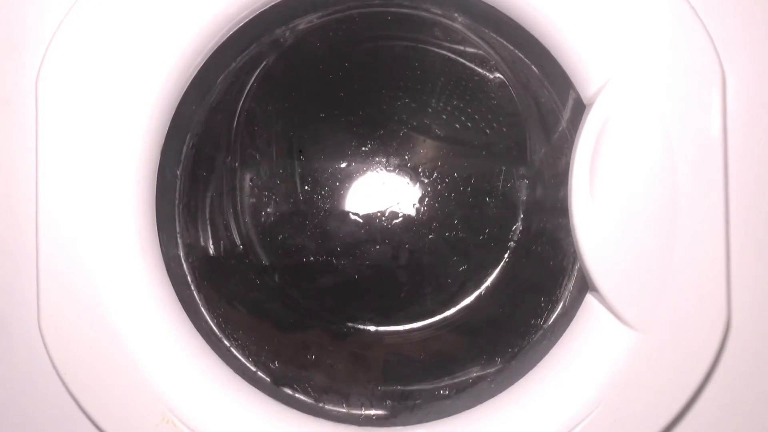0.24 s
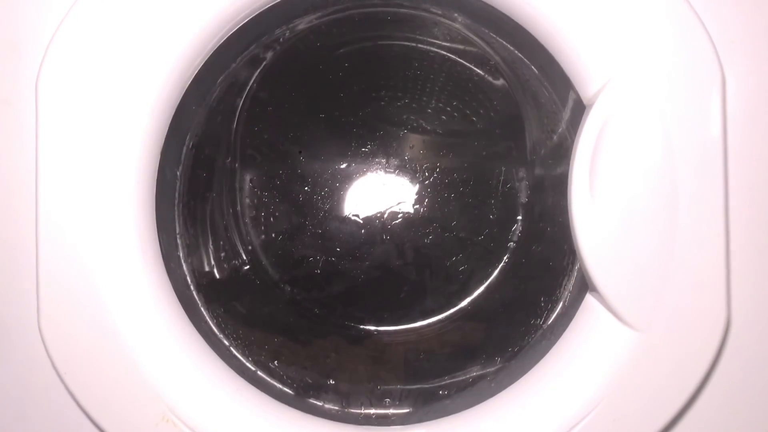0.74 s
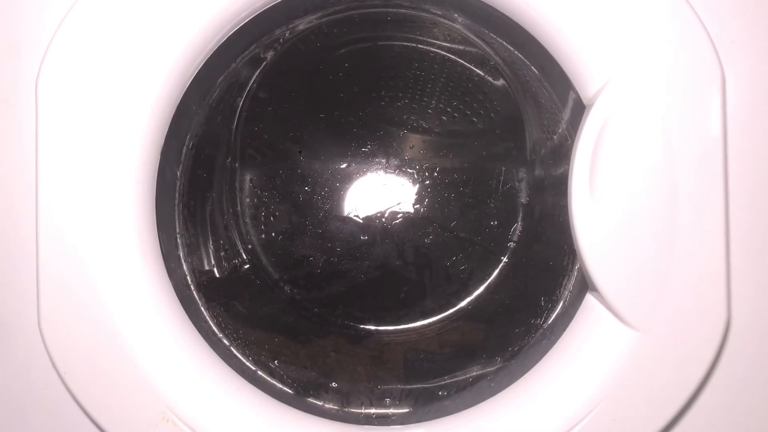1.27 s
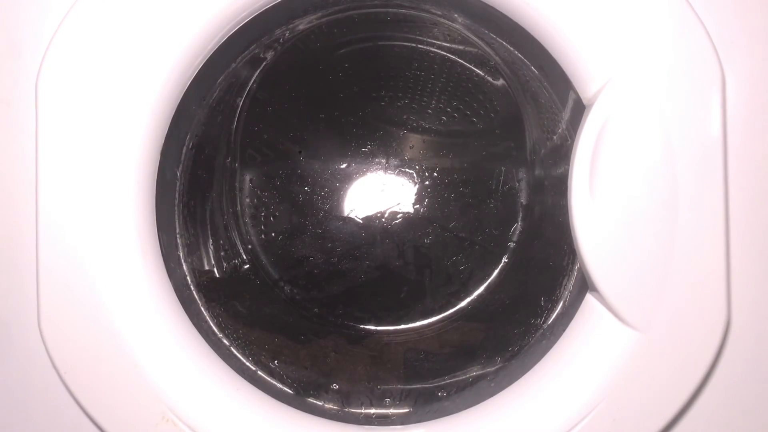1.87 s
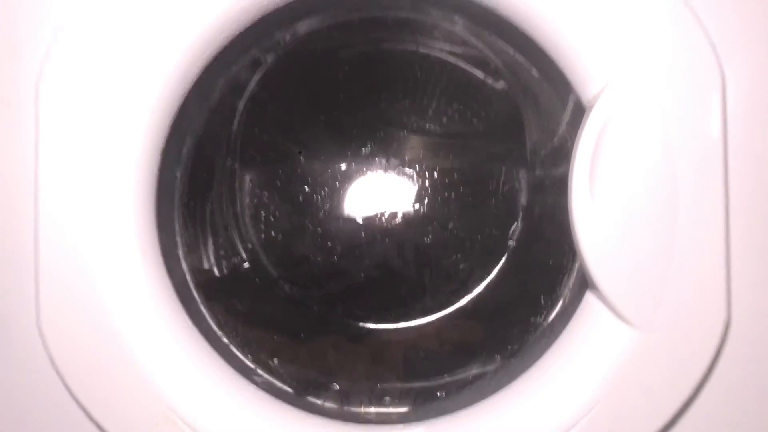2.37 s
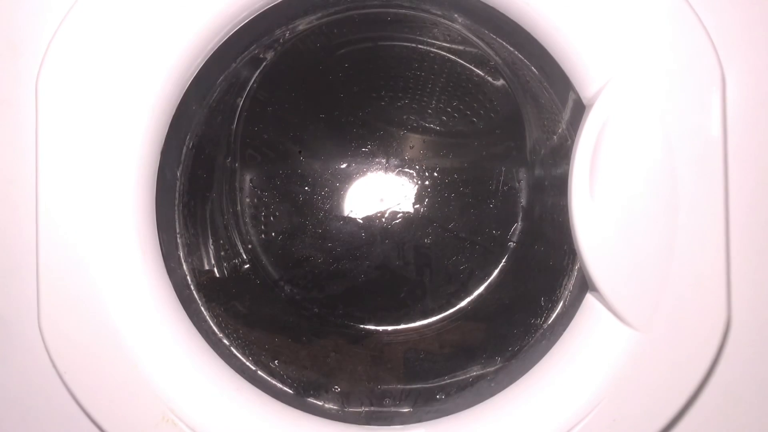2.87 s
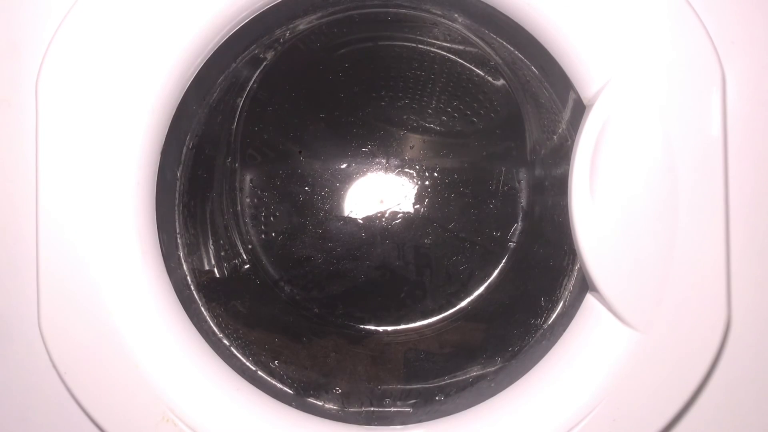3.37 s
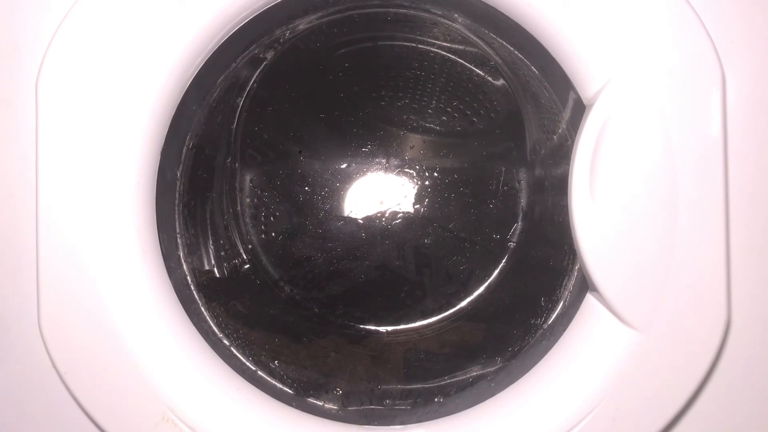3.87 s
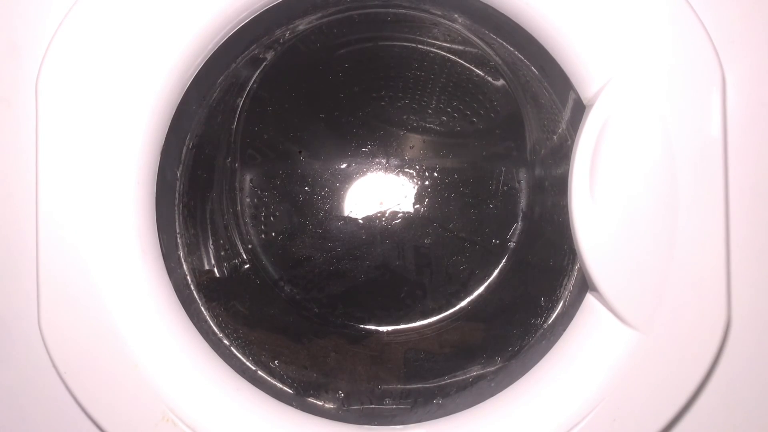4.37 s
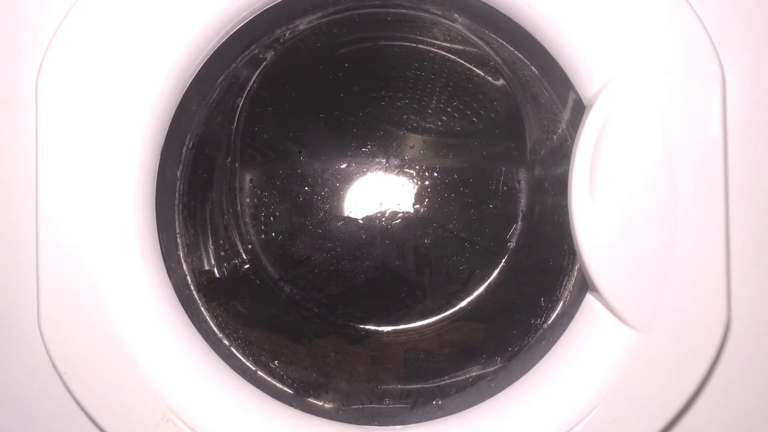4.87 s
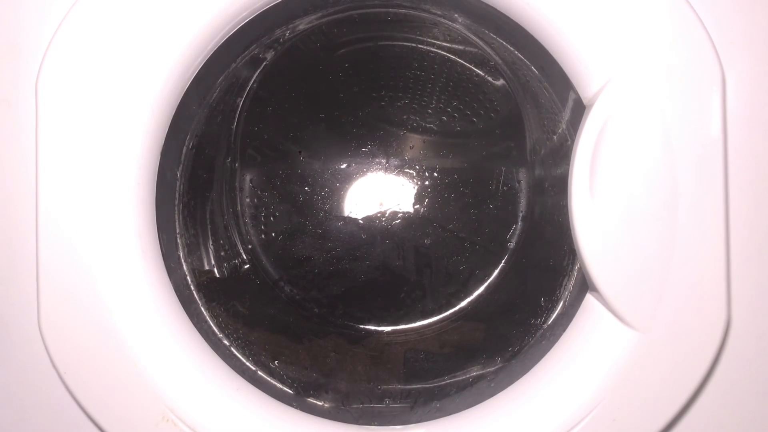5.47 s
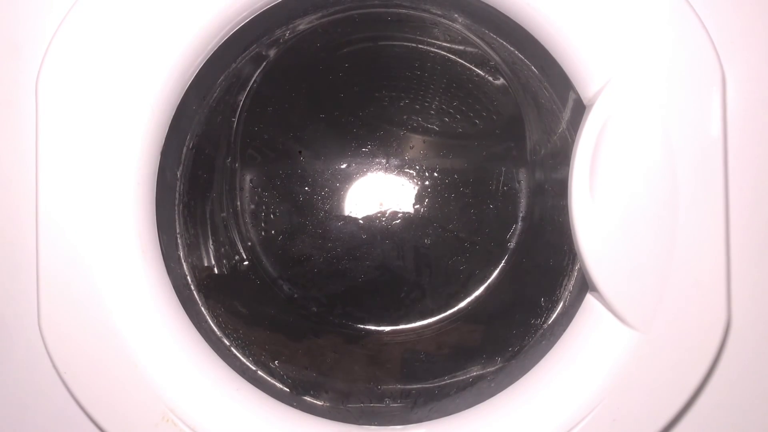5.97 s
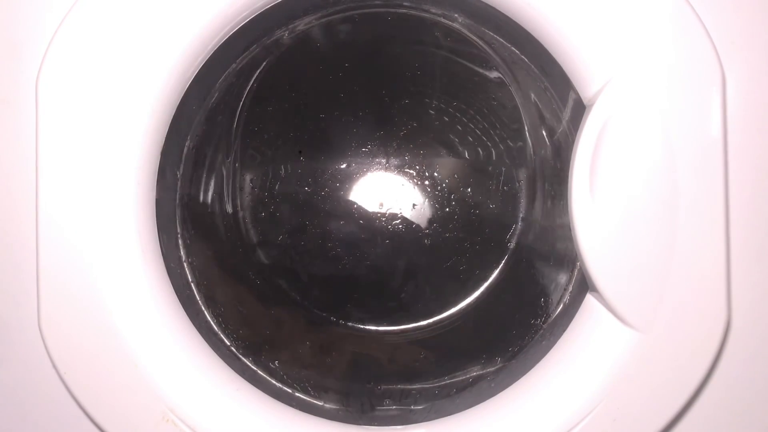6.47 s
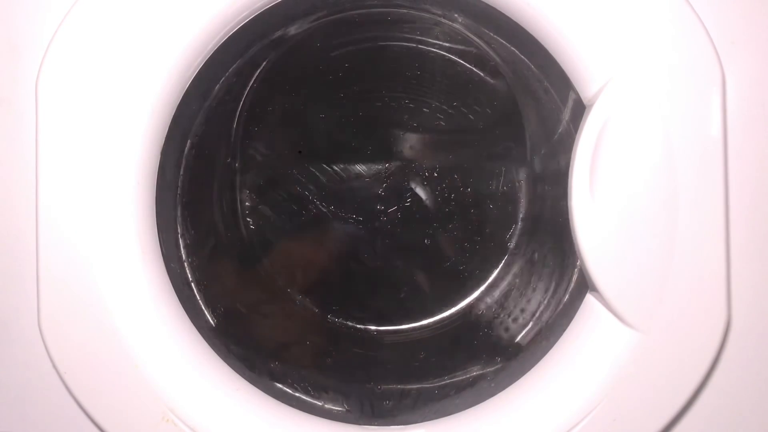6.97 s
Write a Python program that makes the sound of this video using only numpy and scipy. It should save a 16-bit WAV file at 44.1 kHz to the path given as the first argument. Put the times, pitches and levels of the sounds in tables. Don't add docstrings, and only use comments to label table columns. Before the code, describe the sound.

Thumping and scuffing on a washer, one heavy door slam, near silence, a sharp click, then a rising motor hum with sloshing and knocks.

```python
import sys
import numpy as np
from scipy import signal
from scipy.io import wavfile

SR = 44100
rng = np.random.default_rng(int(sys.argv[2]) if len(sys.argv) > 2 else 0)


def elevation(decibels):
    levels = np.asarray(decibels, float)
    return 10 ** (levels / 20)


def bounce(signal):
    frames = np.transpose(np.atleast_2d(signal))
    limited = np.clip(frames, -1, 1)
    pcm = np.round(limited * 32767).astype(np.int16)
    wavfile.write(sys.argv[1], SR, pcm)


N = 318402
TIME = np.arange(N) / SR

# start_s, peak_db, centre_hz
PUSHES = [(0.083, -26, 186), (0.137, -15, 143), (0.198, -19, 127), (0.2535, -5, 150), (0.33, -22.5, 174),
          (0.392, -25, 140), (0.434, -28, 124), (0.501, -18, 120), (0.588, -17.5, 127), (0.656, -15, 137),
          (0.757, -29, 140), (1.706, -32, 160), (1.83, -31.5, 147), (1.87, -33.5, 146),
          (2.001, -30.5, 142.4), (2.036, -32, 166), (2.095, -34.5, 133.9), (2.15, -35, 134.9),
          (2.254, -40, 146.1), (2.3515, 0.5, 134), (2.666, -20.5, 126), (2.838, -38.5, 86.1)]
# start_s, peak_db, centre_hz
STEPS = [(3.601, -33, 110), (3.638, -38.5, 86.1), (4.042, -32.5, 80), (4.091, -39.5, 52.6),
         (4.167, -37.5, 88), (4.235, -29, 51.1), (4.319, -36.5, 48.7), (4.429, -44, 51.1),
         (4.509, -44, 48.4), (4.58, -43, 53.8), (4.767, -35.5, 69.5), (4.792, -39, 59.2),
         (5.794, -37, 67.2), (5.823, -42.5, 54.5), (5.92, -47.5, 53.8)]
# start_s, length_s, sway_db, boom_db
JOSTLES = [(0, .07, -66, -46.5), (0.101, 0.59, -56, -29), (.28, .07, -41, -35), (.72, 0.098, -63, -42),
           (.92, 0.27, -61, -61.5), (1.2, 0.44, -55, -58.5), (1.72, 0.21, -61, -50.5),
           (1.98, 0.22, -68, -56), (2.269, 0.065, -60, -47), (2.4, .16, -39, -40),
           (2.621, .18, -50.5, -43.5), (2.86, .7, -58.5, -60), (3.63, .06, -51.5, -66),
           (4.05, .12, -51.5, -54.5), (4.228, .07, -42, -58), (4.36, 0.28, -60, -62),
           (4.661, 0.39, -66, -66), (5.0, 1.4, -80, -76), (5.718, .14, -64, -60), (6.45, .77, -70, -63.5),
           (6.86, .07, -49, -75), (7.02, 0.074, -65, -56), (7.17, .05, -48, -78)]
JOSTLE_RISE_DB_S, JOSTLE_FALL_DB_S = 600, 130
# mode_hz, level_db, t60_s
CABINET_MODES = [(48.5, 2.5, 0.17), (69.2, -1.5, 0.22), (98, -5.5, 0.23), (127, -1, 0.2),
                 (169.6, -1.5, 0.15), (188.8, -6.5, 0.13)]

# centre_hz, width_hz, level_db
PANEL_MODES = [(290, 60, -1), (355, 40, 0), (445, 50, -1), (545, 60, -2), (670, 60, 0), (830, 60, -1),
               (940, 40, 3), (1025, 60, -3), (1135, 80, -5), (1265, 90, -6), (1440, 100, -9)]
# frequency_hz, density_db (per Hz)
MIDDLE = [(820, -30), (1400, -3), (1690, 1), (1820, -4.5), (2850, -5), (3710, -10.5), (6000, -19.5),
          (7800, -46.5), (13200, -120)]
# frequency_hz, density_db (per Hz)
BRIGHT = [(4500, -7), (6300, -3.5), (9000, -9), (11500, -4)]
# frequency_hz, density_db (per Hz)
AIRY = [(11000, 0), (16500, 0)]
# start_s, length_s, scuff_db, scuff_centre_hz, hiss_db
RUBS = [(0, .05, -60, 468, -73), (.1, .05, -46.5, 600, -62.5), (.16, 0.071, -39.5, 940, -62),
        (.29, 0.096, -35, 955, -59.5), (.42, .14, -44, 900, -64), (.6, 0.085, -44.5, 710, -62.5),
        (.73, .05, -66, 900, -73), (.86, 0.34, -67, 535, -82.5), (.98, 0.037, -63, 600, -73.5),
        (1.19, 0.058, -52.5, 470, -76.5), (1.3, .13, -56.5, 453, -79.5), (1.46, 0.3, -62, 460, -74.5),
        (1.76, .36, -64, 570, -84.5), (2.3, .04, -55, 400, -78.5), (2.45, .1, -66, 700, -73),
        (2.62, .03, -69, 500, -64.5), (2.64, .02, -46, 700, -60), (2.76, 0.77, -72, 500.6, -92)]
# start_s, length_s, scuff_db, scuff_centre_hz, hiss_db
CLOTH = [
    (3.55, .45, -78, 450, -89),
    (4.07, .24, -59, 360, -73.5),
    (4.49, .07, -63.5, 350, -72.5),
    (4.72, 0.12, -72.5, 400, -78),
    (4.85, .22, -62, 401, -72),
]
# start_s, length_s, scuff_db, scuff_centre_hz, hiss_db
WET_LOAD = [
    (5.55, .85, -70.5, 500, -89),
    (5.74, .1, -65, 600, -83),
    (5.96, 0.077, -66.5, 590, -78.5),
    (6.25, .2, -62.5, 577, -83),
    (6.47, 0.21, -54, 443, -69),
    (6.7, 0.17, -53, 600, -69),
    (6.87, 0.33, -54, 540, -66.5),
]
RUB_RISE_DB_S, RUB_FALL_DB_S = 400, 250
HAND_MIDDLE_DB, CLOTH_MIDDLE_DB, WET_MIDDLE_DB = 8, 3, 6
# start_s, dull_peak_db, dull_centre_hz, middle_db, bright_db
DOOR_KNOCKS = [(0.081, -31, 597, -50, -61), (0.143, -38, 940, -54, -54), (0.256, -25, 910, -34, -39.5),
               (0.388, -27, 940, -48, -57), (0.484, -46, 945, -51, -62), (0.576, -37, 805, -52, -57),
               (0.642, -22.5, 430, -49, -60), (0.711, -44, 400, -54, -66), (0.746, -35, 960, -54, -65),
               (1.017, -52, 1300, -68, -69), (1.073, -64, 468, -59.5, -72), (1.176, -41, 322, -63, -70),
               (1.307, -38, 444, -64, -68), (1.703, -50, 649, -57, -59), (1.843, -35, 550, -68, -78),
               (2.002, -33, 484, -64, -71), (2.15, -38, 330, -65, -77)]
# start_s, dull_peak_db, dull_centre_hz, middle_db, bright_db
LATER_KNOCKS = [(3.6, -38, 655, -81, -73), (3.696, -50, 450, -71.5, -82), (3.847, -62.5, 676, -63, -71),
                (4.041, -34.5, 355, -49, -55), (4.098, -51, 350, -69, -69), (4.184, -35, 345, -81, -78),
                (4.207, -28, 690, -56, -73), (4.217, -36, 355, -70, -80), (4.497, -51.5, 350, -70, -70),
                (4.86, -55, 658, -64, -67), (5.789, -64, 598, -63, -79.5), (5.9, -54, 603, -82.5, -87),
                (6.48, -52, 301, -59, -63), (6.918, -48, 603, -70, -60), (7.04, -36, 660, -45, -49),
                (7.1, -34, 670, -47, -53), (7.138, -49, 603, -52, -55)]
# start_s, dull_peak_db, dull_centre_hz, middle_db, bright_db
SLAMS = [
    (2.3455, -9, 880, -21, -23),
    (2.353, -8, 800, -18.5, -21.5),
    (2.6625, -24, 750, -36, -43),
    (5.3695, -35, 600, -60, -60),
]
KNOCK_T60_S, SLAM_T60_S = .075, .066
DULL_SHORTENS_S_PER_DB = .0006

# mode_hz, level_db, t60_s
DOOR_MODES = [(544, -5, .18), (655, -5, .16), (721, -4, .15), (832, -3, .16), (899, -2, .16), (948, 0, .12),
              (1021, -1, .13), (1139, -7, .13), (1264, -8, .13), (1440, -12, .12), (2550, -27, .35),
              (3320, -25, .35)]
# start_s, peak_db
DOOR_TAPS = [
    (.385, -41),
    (2.3465, -21),
    (2.3525, -19),
    (2.665, -39),
]
# mode_hz, level_db, t60_s
LATCH_MODES = [(1670, 1.5, 0.06), (2030, -8, 0.09), (5400, -9, .06), (670, -4.5, .07), (960, -5, .06),
               (2780, -9, .05)]
# start_s, peak_db
LATCH_TAPS = [
    (7.1, -43),
    (7.137, -61),
]
# start_s, peak_db
LATCH_RATTLE = [
    (7.103, -43),
    (7.107, -44),
    (7.113, -50),
]
# mode_hz, level_db, t60_s
DRUM_MODES = [(1712, -9, .6), (1981, -10, .45), (2250, -14, .7), (2498, -6, .45), (2837, -5, .25),
              (3198, 0, .8), (3774, -10, .7), (4398, -14, .6)]
# start_s, peak_db
DRUM_TAPS = [
    (0.714, -57),
]
# mode_hz, level_db, t60_s
RIM_MODES = [(2455, -2, .25), (2545, 0, .35), (2640, -3, .2)]
# start_s, peak_db
RIM_TAPS = [
    (.716, -61),
    (.731, -63),
    (.749, -65),
]

# start_s, peak_db, top_hz, swell_s, t60_s
RAPS = [(.081, -34, 1500, .002, .08), (.13, -40, 3000, .014, .08), (.38, -42, 3200, .008, .1),
        (.59, -44, 3200, .008, .08), (.713, -45, 2800, .006, .2), (1.01, -52, 1700, .01, .12),
        (1.098, -54, 1500, .003, .06), (1.179, -44, 1400, .001, .04), (1.203, -48, 1300, .003, .08),
        (1.235, -50, 1500, .004, .06), (1.31, -48, 1200, .002, .05), (2.127, -48, 800, .001, .03),
        (2.135, -39, 1500, .002, .035), (2.149, -46, 1100, .004, .12), (2.257, -62, 3800, .005, .1),
        (2.357, -20, 1300, .002, .06), (2.663, -26, 2400, .001, .05), (2.682, -34, 1100, .005, .15),
        (4.034, -46, 2400, .003, .06), (4.046, -41, 1500, .004, .1), (4.218, -44, 1300, .005, .1),
        (6.745, -50, 1300, .01, .1), (6.774, -43, 1400, .008, .12), (6.81, -48, 2400, .01, .12),
        (6.85, -45, 1700, .006, .08), (7.037, -34, 3200, .004, .09), (7.097, -36.5, 4200, .005, .1),
        (7.134, -41, 5000, .006, .12)]
# centre_hz, width_hz, level_db
RELAY_MODES = [(900, 600, -7), (1520, 300, -3), (2650, 700, 0), (3400, 300, -7), (4250, 300, -5),
               (5000, 500, -6), (6300, 1300, 0), (8900, 1100, 1), (9700, 500, -6), (12200, 1500, -3),
               (13700, 900, -9), (15100, 600, -7)]
RELAY_S, RELAY_DB, RELAY_T60_S, RELAY_WIDENING = 5.3695, -26.5, .065, 1.5

MAINS_HZ, SPIKE_S = 50.03, 5.199
BUZZ_ON_S, BUZZ_DB = 3.66, -76.5
# harmonic (multiple of the mains), level_db
BUZZ = [(1, 7), (3, 2), (5, 0), (7, -2), (9, -2), (11, -3), (13, -3), (15, -11), (17, -5), (19, -11),
        (21, -11)]
# harmonic (multiple of the mains), level_db
WINDING = [(1, -7.5), (3, 2), (5, -2.5), (7, -4.5), (9, -13.5), (11, -24.5), (13, -10.5)]
# harmonic (multiple of the mains), level_db
ROTOR = [(2, -61), (4, -2.5), (6, 2.5), (8, -11)]
# harmonic (multiple of the mains), level_db
CASING = [(10, -10.5), (12, 3.5), (14, -6), (16, -23.5)]
# time_s, level_db
LOAD = [
    (5.36, -110),
    (5.5, -80),
    (5.8, -68.5),
    (6.1, -69.5),
    (6.3, -63),
    (6.75, -54.5),
    (6.9, -60.5),
    (7.05, -55.5),
    (7.22, -54),
]
ROTOR_DB, ROTOR_GROWTH = -61, 1.8
CASING_TOP_DB, CASING_GROWTH = -62, 1.5
# whistle_hz, level_db
SWITCHING = [(8624, -89), (8726, -88)]
SWITCHING_ON_S, SWITCHING_OFF_S = 5.45, 6.5
# centre_hz, width_hz, level_db (relative to the casing whine)
BRUSHES = [(2300, 260, -13), (3300, 300, -17)]

# time_s, level_db
SLOSH = [
    (6.42, -90),
    (6.5, -64),
    (6.6, -68),
    (6.8, -54),
    (6.95, -62),
    (7.22, -60),
]
BUBBLES_PER_S, BUBBLE_LOW_HZ, BUBBLE_HIGH_HZ, BUBBLE_CYCLES = 500, 700, 2600, 14

# frequency_hz, t60_s
ROOM = [(300, .32), (1100, 0.17), (3000, .2), (8000, .16)]
ROOM_DB = -4.5
# frequency_hz, density_db (per Hz)
FLOOR = [(200, -16), (400, -10), (900, -13), (1300, -8.5), (2040, -20.5), (3300, -15.5), (4900, -22.5),
         (10000, -24.5), (16400, -33)]
FLOOR_DB = -70
# frequency_hz, density_db (per Hz)
HOUSE = [(62, 0), (125, -4)]
HOUSE_DB = -82
# low_hz, high_hz, level_db
PULSED_HISS = [(14200, 15800, -84.5), (11300, 13600, -88)]
PULSE_RATE_HZ, PULSE_CENTRE_S, PULSE_WIDTH_S, PULSE_SCATTER_DB = 30, 3.222, .006, 4.0
# centre_hz, width_hz, share_added (linear)
MICROPHONE = [(7770, 1300, -0.19), (10400, 1100, -0.51), (14800, 1900, 0.6)]
CUTOFF_HZ = 16100


def rms_one(x):
    return x / np.sqrt(np.mean(x ** 2) + 1e-30)


def in_time(rows):
    s, *columns = np.transpose(rows)
    return [np.interp(TIME, s, c) for c in columns]


def at_hz(points, hz):
    point_hz, value = np.array(points).T[:2]
    return np.interp(np.log(hz), np.log(point_hz), value)


def drift(rate):
    r = np.exp(-80 * np.pi * rate / SR)
    white = rng.standard_normal(N // 40 + 2002)
    slow = signal.lfilter([1], [1, -2 * r, r * r], white)[2000:]
    return np.interp(np.arange(N) / 40, np.arange(len(slow)), rms_one(slow))


def ring(x, hz, t60):
    r, w = elevation(-60 / (t60 * SR)), 2 * np.pi * hz / SR
    return signal.lfilter([0, np.sin(w)], [1, -2 * r * np.cos(w), r * r], x + 1e-18)


def banded_noise(spectrum, patchy_db):
    out, together = 0, drift(15)
    low_hz, high_hz = spectrum[0][0], spectrum[-1][0]
    edges = low_hz * 2 ** np.arange(0, np.log2(high_hz / low_hz) + .2, .34)
    white = rng.standard_normal((2, N))
    for k, (low, high) in enumerate(zip(edges, edges[1:])):
        sos = signal.butter(2, [low, high], "band", fs=SR, output="sos")
        band = signal.sosfilt(sos, white[k % 2])
        flicker_db = patchy_db * (0.77 * together + drift(39))
        out = out + band * elevation(at_hz(spectrum, np.sqrt(low * high)) + flicker_db)
    return rms_one(out)


def spells(rows, gains, rise_db_s, fall_db_s):
    t, start, length = TIME[::64], np.array(rows)[:, :1], np.array(rows)[:, 1:2]
    rise_db = -rise_db_s * np.maximum(start - t, 0)
    fall_db = -fall_db_s * np.maximum(t - start - length, 0)
    power = gains ** 2 @ elevation(rise_db + fall_db) ** 2
    return np.array([np.interp(TIME, t, line) for line in np.sqrt(power)])


def cabinet():
    shake_gains = elevation(np.array(JOSTLES)[:, 2:].T)
    sway, boom = spells(JOSTLES, shake_gains, JOSTLE_RISE_DB_S, JOSTLE_FALL_DB_S)
    s, peak_db, centre_hz = np.transpose(PUSHES + STEPS)
    luck = rng.normal(0, 1.6, (len(s), len(CABINET_MODES)))
    out = np.zeros(N)
    for k, (hz, level_db, t60) in enumerate(CABINET_MODES):
        clicks = np.zeros(N)
        distance_db = 9.9 * np.log2(hz / centre_hz) ** 2
        clicks[(s * SR).astype(int)] = elevation(peak_db - 9 + level_db - distance_db + luck[:, k])
        push = signal.windows.hann(int(.4 * SR / hz))
        pushes = signal.oaconvolve(clicks, 2 * push / push.sum())[:N]
        shaking = (sway if k < 2 else boom) * elevation(-7.0 + level_db + 0.53 * drift(11))
        out += ring(pushes, hz, t60) * (-1) ** k
        out += shaking * rms_one(ring(rng.standard_normal(N), hz, t60))
    return out


def focus(centre_hz, spread_db):
    octaves = np.log2(np.array(PANEL_MODES)[:, :1] / centre_hz)
    gains = elevation(np.array(PANEL_MODES)[:, 2:] - spread_db * np.minimum(np.abs(octaves), 1.2))
    return gains / np.sqrt(np.sum(gains ** 2, axis=0))


def rubbing():
    strokes = RUBS + CLOTH + WET_LOAD
    middle_over_db = np.repeat([HAND_MIDDLE_DB, CLOTH_MIDDLE_DB, WET_MIDDLE_DB],
                               [len(RUBS), len(CLOTH), len(WET_LOAD)])
    scuff_db, centre_hz, hiss_db = np.array(strokes)[:, 2:].T
    dull_gains = elevation(scuff_db - 2) * focus(centre_hz, spread_db=11)
    sharp_gains = elevation(np.array([hiss_db + middle_over_db, hiss_db - .6, hiss_db - 10.5]))
    dull = elevation(2.5 * drift(25)) * spells(strokes, dull_gains, RUB_RISE_DB_S, RUB_FALL_DB_S)
    sharp = elevation(1.6 * drift(27)) * spells(strokes, sharp_gains, RUB_RISE_DB_S, RUB_FALL_DB_S)
    return dull, sharp


def panels():
    dull, sharp = rubbing()
    for s, peak_db, centre_hz, middle_db, bright_db in DOOR_KNOCKS + LATER_KNOCKS + SLAMS:
        dullness_db = peak_db - bright_db
        t60 = (KNOCK_T60_S if peak_db < -22 else SLAM_T60_S) - DULL_SHORTENS_S_PER_DB * dullness_db
        i = round(s * SR)
        t = TIME[:min(N - i, SR // 2)]
        rise_s = min(0.00018 * elevation(0.62 * dullness_db), .006)
        burst = elevation(-60 * t / max(t60, .01)) * (1 - np.exp(-t / rise_s))
        air_db = bright_db + .33 * (bright_db + 21)
        dull[:, i:i + len(t)] += elevation(peak_db - 6.5) * focus(centre_hz, spread_db=14.5) * burst
        sharp[:, i:i + len(t)] += np.outer(elevation(np.array([middle_db, bright_db, air_db]) + 1), burst)
    white = rng.standard_normal((2, N))
    out = sum(gain * banded_noise(colour, patchy_db=2.5)
              for gain, colour in zip(sharp, (MIDDLE, BRIGHT, AIRY)))
    for k, (hz, width_hz, _) in enumerate(PANEL_MODES):
        peak = signal.iirpeak(hz, hz / width_hz / 1.6, fs=SR)
        out += dull[k] * rms_one(signal.lfilter(*peak, signal.lfilter(*peak, white[k % 2])))
    return out


def struck(modes, taps):
    s, peak_db = np.transpose(taps)
    out = np.zeros(N)
    for hz, level_db, t60 in modes:
        clicks = np.zeros(N)
        clicks[np.round(s * SR).astype(int)] = elevation(peak_db + level_db + rng.normal(0, 1, len(taps)))
        out += ring(clicks, hz, t60)
    return out


def raps():
    out, t = np.zeros(N + SR), TIME[:SR // 4]
    for s, peak_db, top_hz, swell_s, t60 in RAPS:
        sos = signal.butter(3, [280, top_hz], "band", fs=SR, output="sos")
        puff = rms_one(signal.sosfilt(sos, rng.standard_normal(len(t))))
        late = np.maximum(t - swell_s, 0)
        envelope = elevation(peak_db - 6 - 60 * late / t60) * np.minimum(t / swell_s, 1)
        out[round(s * SR):][:len(t)] += envelope * puff
    return out[:N]


def relay():
    out, t = np.zeros(N), TIME[:SR // 4]
    snap, shaken = rng.standard_normal(len(t)) * elevation(-60 * t / RELAY_T60_S), 0
    for hz, width_hz, db in RELAY_MODES:
        peak = signal.iirpeak(hz, hz / width_hz / RELAY_WIDENING, fs=SR)
        shaken = shaken + elevation(db) * signal.lfilter(*peak, signal.lfilter(*peak, snap))
    out[round(RELAY_S * SR):][:len(t)] = elevation(RELAY_DB) * shaken / np.abs(shaken).max()
    return out


def electrics():
    turn = 2 * np.pi * MAINS_HZ * (TIME - SPIKE_S)
    load_db, = in_time(LOAD)
    rotor_db = ROTOR_DB + ROTOR_GROWTH * (load_db + 60)
    casing_db = CASING_TOP_DB + np.minimum(CASING_GROWTH * (load_db + 64), 0)
    buzz_on = np.clip((TIME - BUZZ_ON_S) / .05, 0, 1)
    out = buzz_on * sum(elevation(BUZZ_DB + db) * np.cos(k * turn) for k, db in BUZZ)
    parts = ((load_db, WINDING, 1.5, .25), (rotor_db, ROTOR, 2.5, .8), (casing_db, CASING, 2.5, .8))
    for level_db, orders, waver_db, slip in parts:
        for k, db in orders:
            lag = 1.5 - .17 * (round(k) - 3) ** 2 + slip * drift(7)
            out += elevation(level_db + db + waver_db * drift(15)) * np.cos(round(k) * turn + lag)
    switch_s = [SWITCHING_ON_S, SWITCHING_ON_S + .05, SWITCHING_OFF_S, SWITCHING_OFF_S + .2]
    on = np.interp(TIME, switch_s, [0, 1, 1, 0])
    for hz, db in SWITCHING:
        out += on * elevation(db + 2.35 * drift(5.7)) * np.cos(2 * np.pi * hz * TIME + 1.4 * drift(9.8))
    for hz, width_hz, db in BRUSHES:
        hiss = signal.lfilter(*signal.iirpeak(hz, hz / width_hz, fs=SR), rng.standard_normal(N))
        out += elevation(casing_db + db) * rms_one(hiss)
    return np.sqrt(2) * out


def slosh():
    level_db, = in_time(SLOSH)
    bursts = rng.random(N) < BUBBLES_PER_S / SR
    strength = elevation(4 * np.minimum(rng.exponential(1, N), 4)) * rng.choice([-1, 1], N)
    pitches = np.geomspace(BUBBLE_LOW_HZ, BUBBLE_HIGH_HZ, 14)
    dealt = rng.integers(0, 14, N)
    rings = sum(ring(strength * bursts * (dealt == k), hz, BUBBLE_CYCLES / hz)
                for k, hz in enumerate(pitches))
    return elevation(level_db) * rms_one(signal.lfilter([.2], [1, -.8], rings))


def room(x):
    t, echo = TIME[:SR // 2], 0
    for hz in 180 * 2. ** np.arange(7):
        sos = signal.butter(2, [hz, min(2 * hz, .45 * SR)], "band", fs=SR, output="sos")
        band = signal.sosfilt(sos, rng.standard_normal(len(t)))
        echo = echo + band * elevation(-60 * t / at_hz(ROOM, hz * np.sqrt(2)))
    echo = echo * (t > .003)
    return elevation(ROOM_DB) * signal.oaconvolve(x, echo / np.sqrt(np.sum(echo ** 2)))[:N]


def pulsed_hiss():
    pulse_no = np.round((TIME - PULSE_CENTRE_S) * PULSE_RATE_HZ).astype(int)
    count = pulse_no.max() - pulse_no.min() + 1
    out = 0
    for low_hz, high_hz, db in PULSED_HISS:
        strength, jitter = rng.standard_normal((2, count))[:, pulse_no - pulse_no.min()]
        offset_s = TIME - PULSE_CENTRE_S - pulse_no / PULSE_RATE_HZ - .003 * jitter
        pulse = np.exp(-.5 * (offset_s / PULSE_WIDTH_S) ** 2)
        sos = signal.butter(3, [low_hz, high_hz], "band", fs=SR, output="sos")
        hiss = rms_one(signal.sosfilt(sos, rng.standard_normal(N)))
        out = out + elevation(db + PULSE_SCATTER_DB * strength) * pulse * hiss
    return out


def still_air():
    return elevation(FLOOR_DB) * banded_noise(FLOOR, patchy_db=.25)


def house():
    return elevation(HOUSE_DB) * banded_noise(HOUSE, patchy_db=1.5)


def scene():
    body = cabinet() + electrics()
    latch = struck(LATCH_MODES, LATCH_TAPS) + struck(LATCH_MODES, LATCH_RATTLE)
    contact = panels() + latch + raps() + relay() + slosh()
    drum = struck(DRUM_MODES, DRUM_TAPS) + struck(RIM_MODES, RIM_TAPS)
    rings = struck(DOOR_MODES, DOOR_TAPS) + drum
    background = pulsed_hiss() + still_air() + house()
    return (body + contact + room(contact) + rings + background)[None]


def band_limit(x):
    return signal.sosfilt(signal.butter(12, 16570, fs=SR, output="sos"), x)


def record(dry):
    for hz, width_hz, share in MICROPHONE:
        dry = dry + share * signal.lfilter(*signal.iirpeak(hz, hz / width_hz, fs=SR), dry)
    lean = signal.sosfilt(signal.butter(2, 33, "high", fs=SR, output="sos"), dry)
    dulled = signal.sosfilt(signal.cheby2(16, 50, CUTOFF_HZ, fs=SR, output="sos"), lean)
    rounded = dulled / (1 + np.abs(dulled) ** 6) ** (1 / 6)
    return band_limit(rounded)


dry = scene()
out = record(dry)
bounce(out)
```